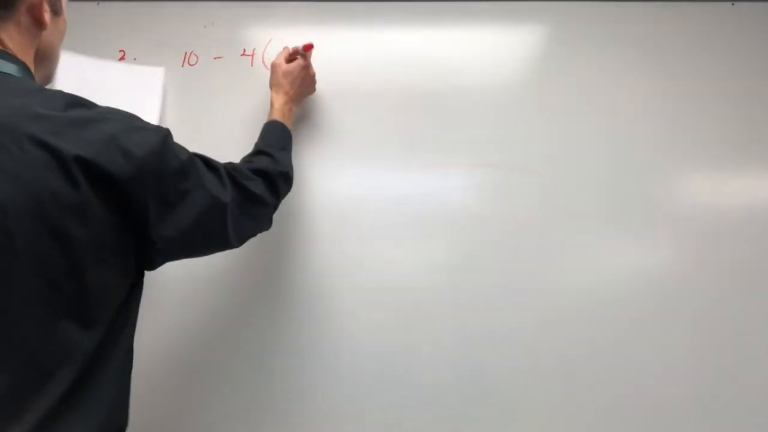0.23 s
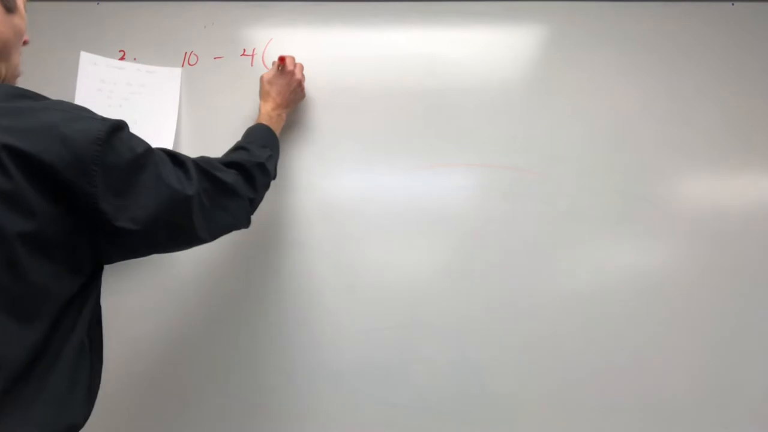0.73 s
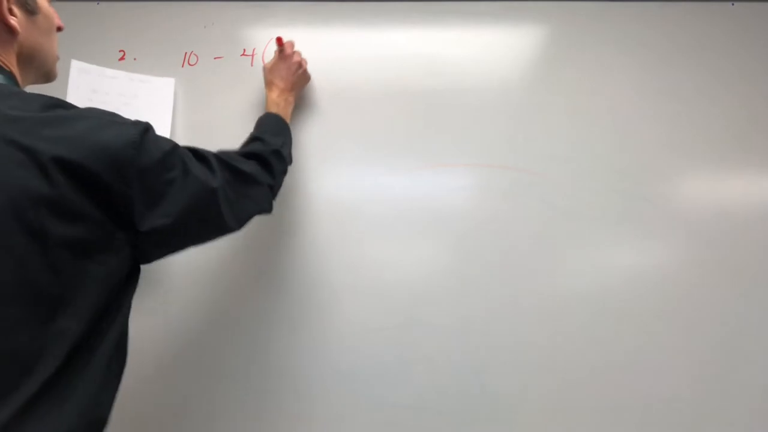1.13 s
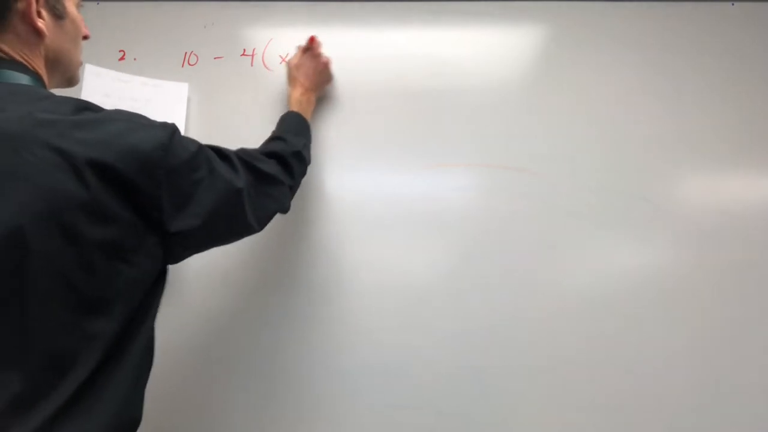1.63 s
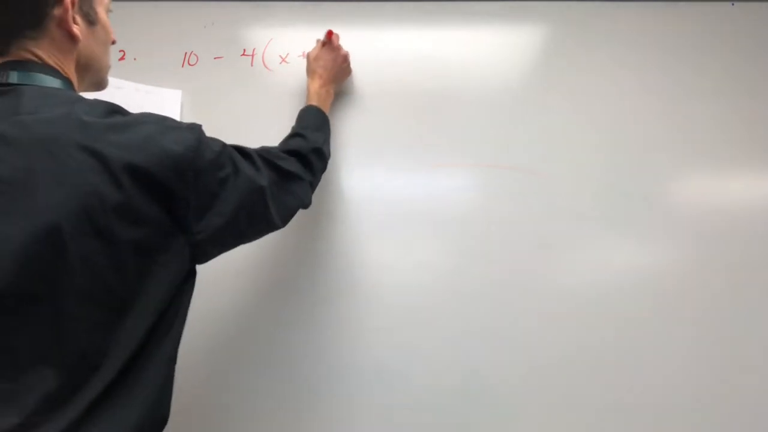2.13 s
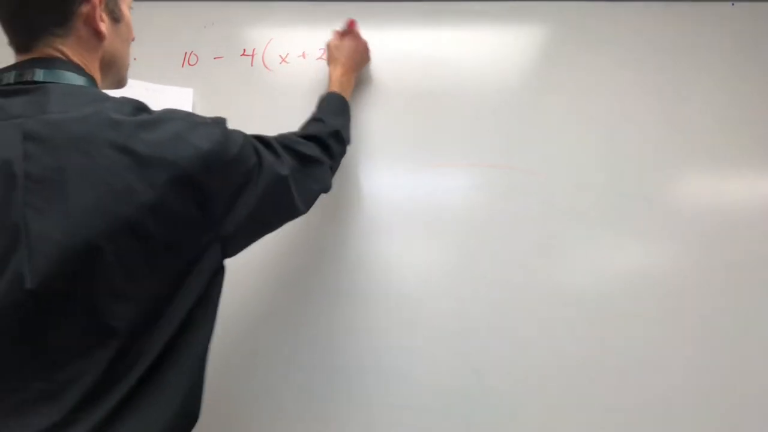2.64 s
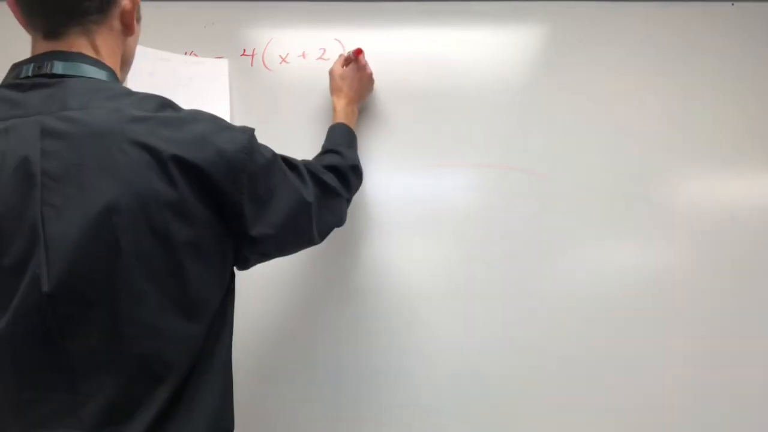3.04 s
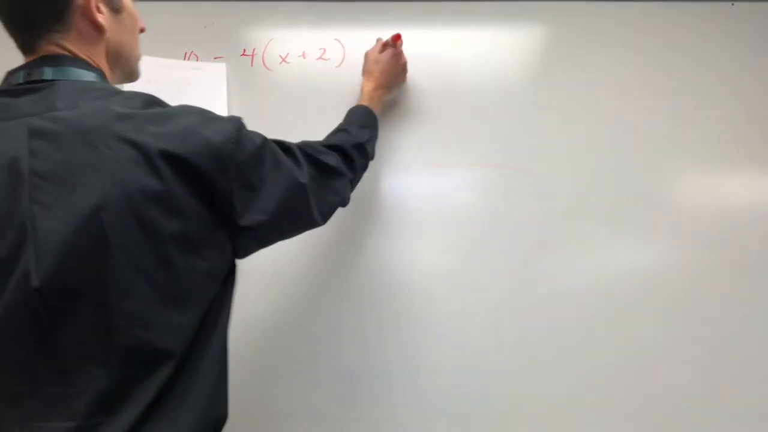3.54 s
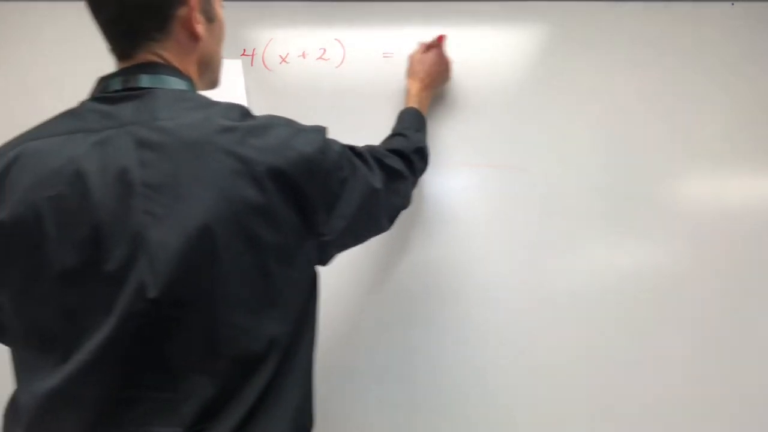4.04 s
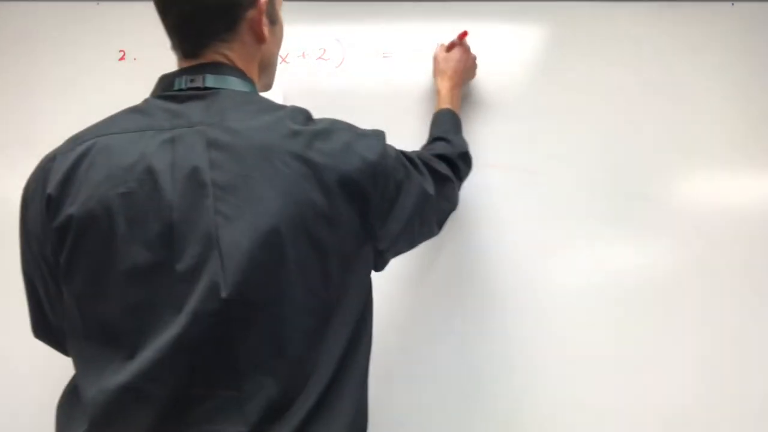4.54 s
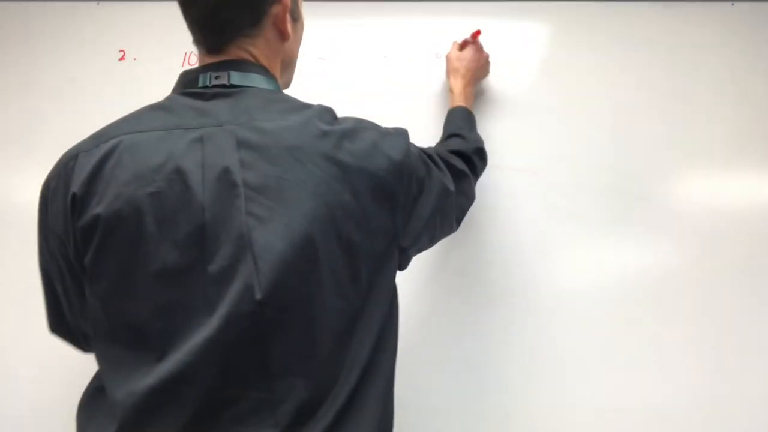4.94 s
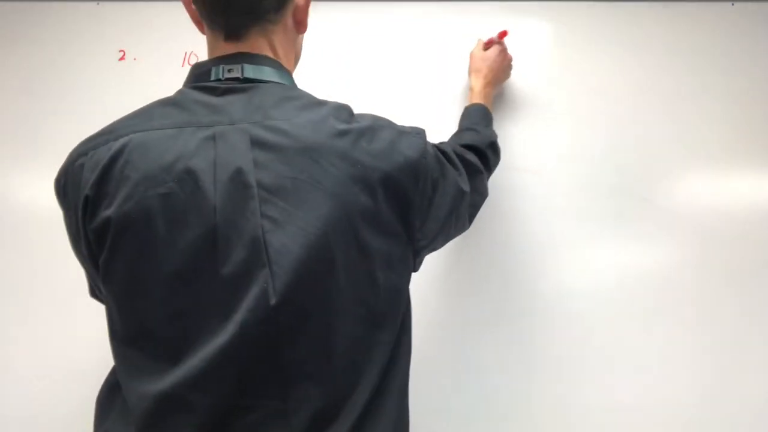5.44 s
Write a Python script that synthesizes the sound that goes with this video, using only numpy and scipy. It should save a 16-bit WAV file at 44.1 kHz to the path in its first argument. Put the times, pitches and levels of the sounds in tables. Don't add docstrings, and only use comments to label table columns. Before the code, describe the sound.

A felt-tip marker taps and swishes on a whiteboard, hollow thumps and thin squeaky hisses over faint clothing and paper rustle in a quiet room.

```python
import sys
import numpy as np
from scipy import signal
from scipy.io import wavfile
from scipy.ndimage import uniform_filter1d

SR = 44100
rng = np.random.default_rng(int(sys.argv[2]) if len(sys.argv) > 2 else 0)


def wav_record(signal):
    frames = np.transpose(np.atleast_2d(signal))
    bounded = np.clip(frames, -1, 1)
    quanta = np.round(bounded * 32767).astype(np.int16)
    wavfile.write(sys.argv[1], SR, quanta)


def ratio(d):
    e = np.asarray(d, float) / 20
    return 10 ** e


N = 250620

# f/Hz, level/dB per Hz
AIR = [(15, -9), (25, 4.5), (64, 7), (201, -7.5), (277, -7.5), (354, -4), (405, -24), (490, -1.5),
       (677, -22.5), (1330, -34.5), (2050, -26.5), (7720, -26.5), (8380, -30.5), (14800, -32), (16000, -40)]
AIR_DB = -69.5
# f/Hz, level/dB per Hz
FELT = [(1180, -44), (2000, 10.5), (3340, 0.5), (4410, -9.5), (5680, -13), (6360, -13.5), (8850, -22),
        (10000, -23), (11500, -25), (16000, -31.5)]
# f/Hz, width/Hz, level/dB
SQUEAL = [(3660, 130, -13.5), (4390, 360, 1.5), (5030, 450, 1), (6280, 500, -5), (7960, 400, -6.5)]
SQUEAL_PER_DB, FELT_EDGE_HZ = .4, 3600
# t/s of fastest moment, level/dB, speeding up/s, slowing down/s
STROKES = [(0.0, -64, .01, .17), (0.312, -65, .012, .009), (0.41, -66.5, 0.095, .09), (0.87, -76, .3, 0.23),
           (1.075, -64.5, 0.06, 0.093), (1.324, -64, 0.048, 0.09), (1.775, -67, 0.05, .07),
           (2.165, -63.5, .11, 0.087), (2.255, -67, 0.01, 0.15), (2.69, -63.5, .15, 0.098),
           (2.9, -76.5, 0.21, 0.064), (3.01, -78, 0.027, .08), (3.25, -76, .04, .04),
           (4.235, -65, 0.096, 0.13), (4.345, -68, 0.073, 0.1), (4.43, -71.5, .04, 0.074),
           (4.71, -65.5, .1, .065), (4.9, -68.5, 0.044, 0.15), (5.64, -67, .06, 0.066)]
STROKE_FADE_DB, STROKE_ROUND = 15.5, 1.01
REST_DB = -81
SKID_DB, SKID_PER_DB, SKID_T60_S = -73.5, 4.5, 0.5
# f/Hz, level/dB per Hz
RUSTLE = [(240, -21), (400, 15), (674, 12.5), (1100, 13.5), (2680, 2.5), (3710, -4), (6760, -11.5),
          (9000, -15), (11700, -30), (19800, -120)]
# t/s, level/dB
SLEEVE = [
    (0.0, -64.5),
    (0.11, -67.5),
    (0.54, -74),
    (0.81, -75.5),
    (1.1, -75),
    (3.3, -75.5),
    (3.67, -70),
    (4.14, -73),
    (5.24, -75.5),
]
# t/s, level/dB, rise/s, t60/s
SCUFFS = [
    (0.085, -55.5, 0.0033, 0.1),
    (0.276, -57, 0.0047, 0.26),
    (0.305, -74, 0.01, 0.25),
    (0.498, -61, 0.0031, 0.21),
    (0.734, -68, 0.0029, 0.39),
    (2.251, -57.5, 0.0017, 0.17),
    (2.845, -54, 0.024, 0.18),
    (2.993, -58, 0.002, 0.28),
    (3.235, -54, 0.0074, 0.083),
    (4.279, -56.5, 0.011, 0.069),
]
ARM_DB, ARM_S = -2.5, 0.13
# t/s, peak level/dB, low/dB, middle/dB, high/dB
TAPS = [(1.019, -28, 6, -15, -11), (1.273, -27, 9, -8, -9), (1.558, -24, 5.5, -1.5, -5.5),
        (1.737, -25, 1, -6, -12), (2.027, -26.5, 4, -9, -11.5), (2.572, -24, 3.5, -1.5, -1),
        (3.566, -24.5, 1.5, -1.5, -6.5), (3.723, -24, 6, 4, -1), (3.966, -23, -1, 8, -1.5),
        (4.157, -26.5, -0.5, -1, -10.5), (4.633, -26.5, 1.5, -5, -7.5), (4.865, -27.5, -1, 2.5, -6),
        (5.605, -28, 1.5, 5, 1)]
# t/s, peak level/dB
GRAZES = [
    (0.333, -48),
    (1.532, -46),
    (2.249, -52.5),
    (2.537, -47),
    (2.993, -55.5),
    (3.951, -40.5),
]
SPOT_HZ = [160, 300, 520, 900]
# f/Hz, level/dB, t60/s
BOARD = [(159.2, -8, 0.45), (174.7, -11, 0.29), (274.7, 4, 0.42), (336, 6.5, 0.29), (362.1, 4.5, 0.18),
         (435.6, 2.5, 0.11), (471, 4.5, 0.089), (478.3, -7, 0.24), (562.8, -0.5, 0.2), (600, -60, 0.09),
         (684, -7, 0.16), (800, -47, .06), (864, -11.5, 0.18), (957, -10.5, 0.088), (1071, -17.5, 0.18),
         (1210, -8.5, 0.034), (1416, -21, 0.088), (1610, -16.5, 0.044), (1986, -27.5, 0.12)]
REACH = 14
# t/s, peak level/dB
CAP_CLICKS = [
    (0.3761, -36),
    (0.3793, -30.5),
    (0.3815, -33.5),
    (0.383, -43),
]
# f/Hz, level/dB, t60/s
CAP_RING = [(1400, -10, .008), (1900, -11, .008), (3600, -12, .008), (3650, -28, .1), (5300, -20, .008),
            (8300, -16, .005)]
# t/s, peak level/dB, ring f/Hz, crack over ring/dB, spread/s
SNAPS = [
    (0.393, -36.5, 960, -10, 0.004),
    (2.209, -39.5, 1170, -1, 0.0055),
    (2.25, -34, 1290, -43, 0.0037),
]
# f/Hz, t60/s
ROOM_T60 = [(100, 0.79), (260, 0.69), (700, 0.37), (1800, 0.79), (6000, 0.27)]
CUTOFF_HZ = 16500


def rms_one(x):
    return x / np.sqrt(np.mean(x ** 2) + 1e-20)


def at_hz(points, hz):
    table_hz, value = np.array(points).T
    return np.interp(np.log(hz), np.log(table_hz), value)


def along(rows):
    return np.interp(np.arange(N) / SR, *np.transpose(rows))


def drift(rate):
    r = np.exp(-80 * np.pi * rate / SR)
    white = rng.standard_normal(N // 40 + 2002)
    slow = signal.lfilter([1], [1, -2 * r, r * r], white)[2000:]
    return np.interp(np.arange(N) / 40, np.arange(len(slow)), rms_one(slow))


def cut(x, hz, kind, order):
    return signal.sosfilt(signal.butter(order, hz, kind, fs=SR, output="sos"), x)


def ring(clicks, hz, t60):
    r, w = ratio(-60 / (t60 * SR)), 2 * np.pi * hz / SR
    return signal.lfilter([0, np.sin(w)], [1, -2 * r * np.cos(w), r * r], clicks + 1e-18)


def pole_pair(hz, width_hz):
    r = np.exp(-np.pi * width_hz / SR)
    return r, np.array([1, -2 * r * np.cos(2 * np.pi * hz / SR), r * r])


def resonance(x, hz, width_hz):
    r, poles = pole_pair(hz, width_hz)
    return signal.lfilter([(1 - r * r) / 2, 0, (r * r - 1) / 2], poles, x)


def spread_out(x, hz, width_hz):
    _, poles = pole_pair(hz, width_hz)
    return signal.lfilter(poles[::-1], poles, x)


def bands(white, low_hz, high_hz):
    edges = low_hz * 2 ** np.arange(0, np.log2(high_hz / low_hz), 1 / 3)
    for k, (low, high) in enumerate(zip(edges, edges[1:])):
        band = signal.butter(2, [low, high], "band", fs=SR, output="sos")
        yield np.sqrt(low * high), signal.sosfilt(band, white[k % 2])


def hiss(spectrum, patchy_db, rate, grain_db):
    run_in = 8000
    shape = (2, N + run_in)
    white = rng.standard_normal(shape) * ratio(grain_db * rng.exponential(1, shape))
    total = np.zeros(N)
    for hz, band in bands(white, round(spectrum[0][0], -1), 20500):
        total += ratio(at_hz(spectrum, hz) + patchy_db * drift(rate)) * band[run_in:]
    return rms_one(total)


def ventilation():
    air = hiss(AIR, patchy_db=.5, rate=3, grain_db=0)
    return ratio(AIR_DB + 4.5) * cut(air, 42, "high", order=6)


def earlier_tap():
    boom = cut(rng.standard_normal(N + 4000), 120, "high", order=2)
    boom = cut(boom, 310, "low", order=2)[4000:]
    return ratio(-59.5 - 60 * np.arange(N) / SR / 0.82) * rms_one(boom)


def pen_speed():
    t = np.arange(0, N + 40, 40) / SR
    power = ratio(REST_DB) ** 2
    for s, db, rise, fall in STROKES:
        away = np.where(t < s, (s - t) / rise, (t - s) / fall)
        power = power + ratio(db - STROKE_FADE_DB * away ** STROKE_ROUND) ** 2
    for s, db, *_ in TAPS:
        skid_db = SKID_DB + SKID_PER_DB * (db + 24.5) - 60 * np.maximum(t - s, 0) / SKID_T60_S
        power = power + (t >= s) * ratio(skid_db) ** 2
    return np.interp(np.arange(N) / SR, t, np.sqrt(power))


def felt(speed):
    fibres = hiss(FELT, patchy_db=2, rate=15, grain_db=1.0)
    squeal = np.zeros(N)
    for hz, width_hz, db in SQUEAL:
        waver_db = 10 + 3 * drift(7)
        squeal += ratio(db + waver_db) * resonance(fibres, hz, width_hz)
    squeal *= (speed / speed.max()) ** SQUEAL_PER_DB * ratio(0.5)
    sliding = cut(fibres + squeal, 5140, "high", order=2)
    sliding = sliding + ratio(8.0) * cut(fibres, 6300, "high", order=2)
    return speed * rms_one(cut(sliding, FELT_EDGE_HZ, "high", order=3))


def cloth(speed):
    t = np.arange(N) / SR
    arm = ratio(ARM_DB) * uniform_filter1d(speed, round(ARM_S * SR))
    gain = np.hypot(ratio(along(SLEEVE)), arm)
    for s, db, rise, t60 in SCUFFS:
        age = np.maximum(t - s, 0)
        gain = gain + ratio(db - 60 * age / t60) * (1 - np.exp(-age / rise))
    return gain * hiss(RUSTLE, patchy_db=1.5, rate=20, grain_db=1.5)


def landing(db, low_db, middle_db, high_db, chance, damping):
    hz, mode_db, t60 = np.transpose(BOARD)
    t = np.arange(9000)[:, None] / SR
    spot_db = at_hz(list(zip(SPOT_HZ, [low_db, 0, middle_db, high_db])), hz)
    start_db = db + spot_db + mode_db - 14.0 + 2 * chance
    decay_db = 60 * t / (damping * np.minimum(t60, .16))
    modes = ratio(start_db - decay_db) * np.sin(2 * np.pi * hz * t)
    low = modes @ (hz < 765)
    high = modes @ ((hz >= 765) * (-1.) ** np.arange(len(hz)))
    reach_hz = np.clip(720 + REACH * high_db, 610, 800)
    low = spread_out(cut(low, reach_hz, "low", order=6), 350, 700)
    low = -spread_out(cut(low, 150.0, "high", order=4), 166, 72)
    return low + cut(high, 650, "high", order=2)


def board(rows, chance, damping):
    out, push = np.zeros((2, N + 9000))
    for (s, *blow), lot in zip(rows, chance):
        i = round(s * SR)
        out[i:i + 9000] += landing(*blow, lot, damping)
        push[i] = ratio(blow[0])
    low_hum = ratio(-32.0) * cut(ring(push, 58, 0.5), 120, "low", order=2)
    tick = cut(push + 1e-12 * rng.standard_normal(len(push)), 1300, "high", order=2)
    tick = ratio(-7.0) * cut(tick, 2440, "low", order=2)
    return (out + low_hum + spread_out(tick, 1780, 660))[:N]


def cap_click():
    clicks = np.zeros(N)
    for s, db in CAP_CLICKS:
        clicks[round(s * SR)] = ratio(db)
    crack = cut(clicks + 1e-12 * rng.standard_normal(N), 1030, "high", order=2)
    crack = cut(crack, 7900, "low", order=6)
    for hz in (1450, 2520, 4630, 6200, 8470):
        crack = spread_out(crack, hz, 400)
    return ratio(10.5) * crack + sum(ratio(db) * ring(clicks, hz, t60) for hz, db, t60 in CAP_RING)


def snaps():
    out, lots = np.zeros(N), rng.random((len(SNAPS), 2, 6))
    for (s, db, hz, crack_db, spread), (when, size) in zip(SNAPS, lots):
        clicks = np.zeros(2000)
        places = (spread * SR * (when - when.min())).astype(int)
        clicks[places] = ratio(-8 * size) * np.sign(size % .2 - .1)
        crack = cut(cut(clicks, 820, "high", order=2), 6600, "low", order=2)
        i = round(s * SR)
        out[i:i + 2000] += ratio(db - 9) * (ring(clicks, hz, 0.011) + ratio(crack_db) * crack)
    return out


def room(x):
    t = np.arange(round(.8 * SR)) / SR
    out, place = 0, 1.3 * np.arange(N) / SR
    for weight in (np.cos(place), np.sin(place)):
        white = rng.standard_normal((2, len(t)))
        tail = sum(band * ratio(-60 * t / at_hz(ROOM_T60, hz)) for hz, band in bands(white, 40, 14000))
        tail *= 1 - np.exp(-(t / .014) ** 2)
        out = out + signal.fftconvolve(x * weight, tail / np.sqrt(np.sum(tail ** 2)))[:N]
    return out


def scene():
    speed = pen_speed()
    bed = ventilation() + earlier_tap() + felt(speed) + cloth(speed)
    rows = TAPS + [(s, db, 0, -3.0, -4.0) for s, db in GRAZES]
    chance = rng.standard_normal((len(rows), len(BOARD)))
    thump = board(rows, chance, damping=1)
    sideways = board(rows, chance, damping=.45)
    snap = cap_click() + snaps()
    echo = room(ratio(-7.5) * sideways + ratio(-18) * snap)
    return (bed + thump + snap + echo)[None]


def band_limit(x):
    return signal.sosfilt(signal.butter(12, 16180, fs=SR, output="sos"), x)


def record(dry):
    top_cut = signal.cheby2(12, 60, CUTOFF_HZ, fs=SR, output="sos")
    mix = signal.sosfilt(top_cut, dry)
    return band_limit(mix)


dry = scene()
out = record(dry)
wav_record(out)
```